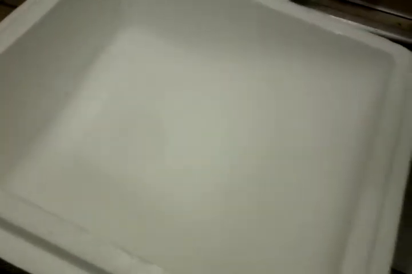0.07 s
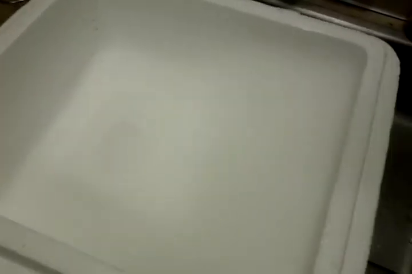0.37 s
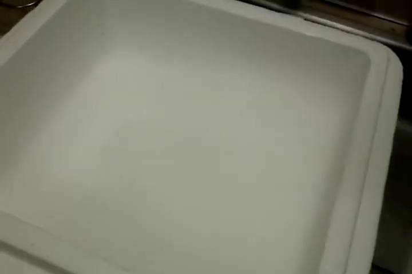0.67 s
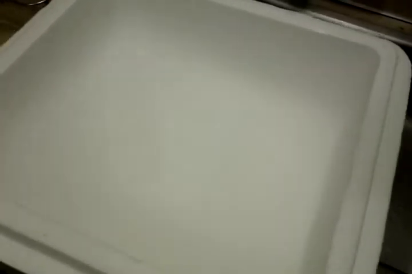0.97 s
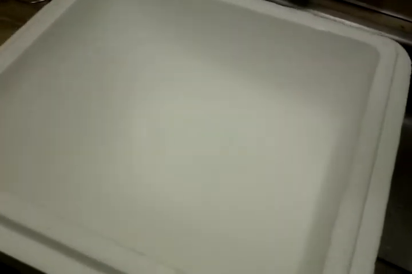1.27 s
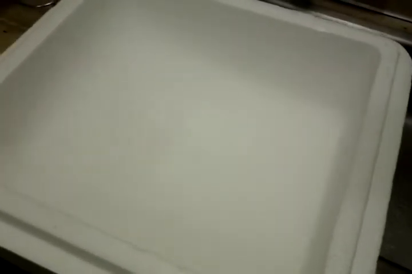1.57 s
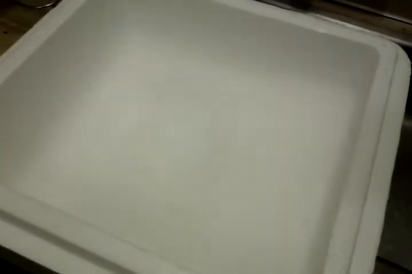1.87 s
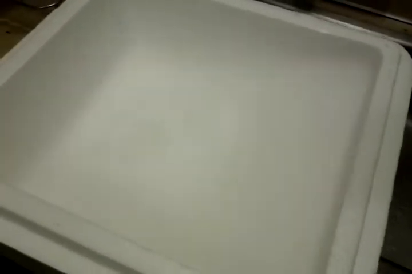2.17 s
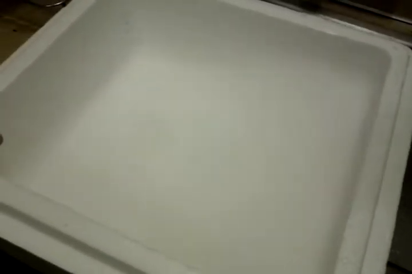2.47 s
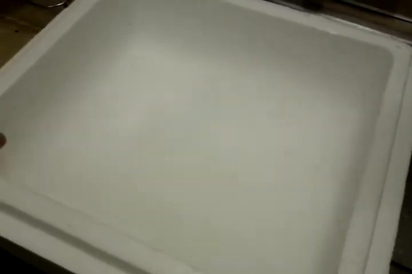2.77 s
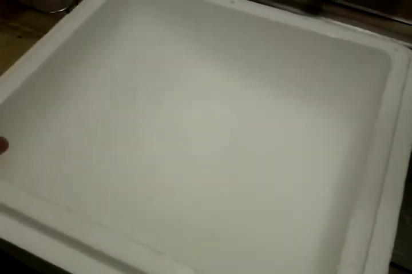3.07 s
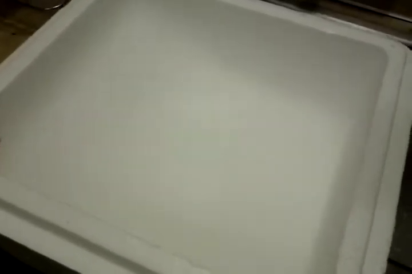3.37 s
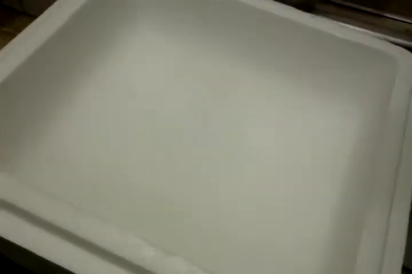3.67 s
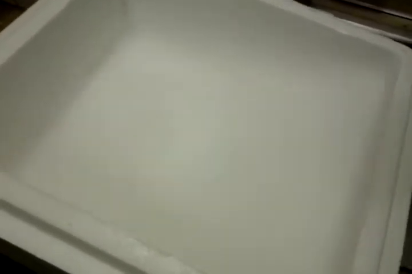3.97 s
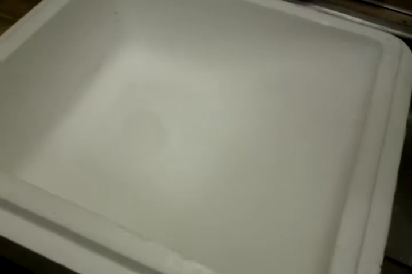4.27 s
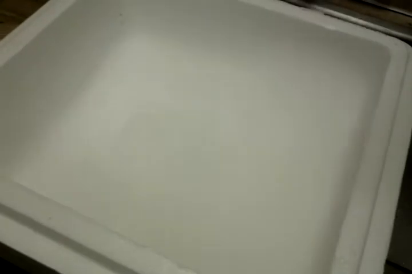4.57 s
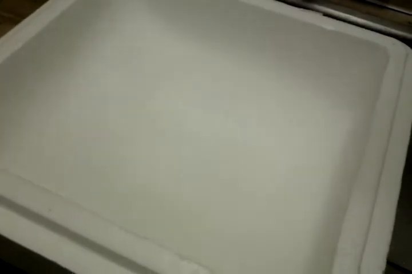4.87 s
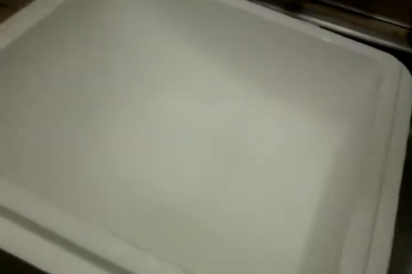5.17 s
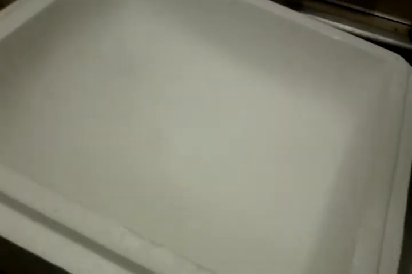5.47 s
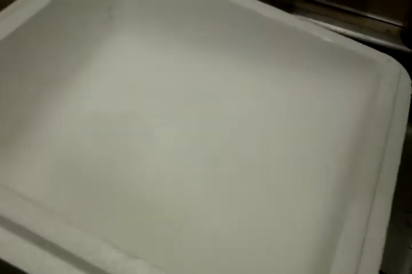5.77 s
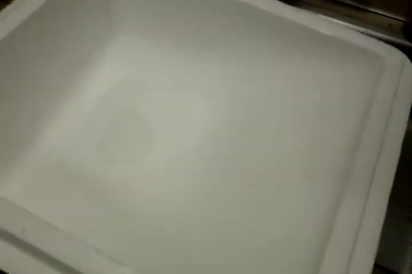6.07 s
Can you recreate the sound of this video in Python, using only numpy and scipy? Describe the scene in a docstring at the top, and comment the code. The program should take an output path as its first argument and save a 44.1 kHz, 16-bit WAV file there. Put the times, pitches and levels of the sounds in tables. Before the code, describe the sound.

Heard up close in a hushed room, dry ice in a plastic tub squeaks briefly, then snaps several times in quick succession, making the tub thump. It settles to a faint fizz with a few isolated clicks. Then a second strong snap sets off scattered crackling, tiny high squeaks and occasional light bumps, while a soft hiss of gas swells and fades underneath.

```python
"""Short, high squeaks come first, then a burst of sharp cracks: dry ice in a plastic tub, close by.
Escaping gas makes the ice squeak, and the chilled ice snaps and crackles.
Shifting pieces knock on the tub, and every crack kicks it too. In between, fine ticks,
faint squeaks and a soft hiss follow the flow of gas, over the hush of a quiet room."""
import sys
import numpy as np
from scipy import signal
from scipy.io import wavfile
from scipy.ndimage import uniform_filter1d, minimum_filter1d

SR = 44100
rng = np.random.default_rng(int(sys.argv[2]) if len(sys.argv) > 2 else 0)


def generate_wav(sig):
    """Save sig (samples, or channels by samples) to the path in sys.argv[1] as 16-bit PCM at SR."""
    pcm = np.round(np.clip(np.atleast_2d(sig).T, -1, 1) * 32767).astype(np.int16)
    wavfile.write(sys.argv[1], SR, pcm)


N = 274743
BINS = np.fft.rfftfreq(2048, 1 / SR)  # the frequencies [Hz] at which a filter's gain is set
ROOM_FADE_S, TUB_FADE_S = 0.51, 0.12  # time for the echoes to fade by 60 dB


def amp(db):
    """Turns decibels into a gain to multiply by."""
    return 10 ** (np.asarray(db) / 20)


def unit_level(x):
    """Scales x so that its average strength (rms) is 1."""
    return x / np.sqrt(np.mean(np.abs(x) ** 2) + 1e-20)


def tone_curve(points):
    """Joins (frequency, level) points into a gain for each frequency in BINS."""
    hz, db = np.transpose(points)
    return amp(np.interp(np.log(BINS + 1), np.log(hz + 1), db))


def bump(hz, centre_hz, octaves):
    """A bell-shaped gain around a centre frequency."""
    return np.exp(-.5 * (np.log2((hz + 1) / centre_hz) / octaves) ** 2)


def add(mix, start_s, sound):
    """Mixes a sound in at its start time."""
    part = mix[max(round(start_s * SR), 0):][:len(sound)]
    part += sound[:len(part)]


def colour(x, gain):
    """Shapes the tone of x. The filter never rings ahead of a sound, so snaps stay sharp."""
    log_gain = np.log(np.maximum(gain, gain.max() * 1e-4))
    mirrored = np.concatenate([log_gain, log_gain[-2:0:-1]])
    taps = np.fft.ifft(np.exp(np.conj(signal.hilbert(mirrored)))).real
    return signal.oaconvolve(x, taps[:len(BINS)])[:len(x)]


def low_pass(x, edge_hz):
    """Cuts away the treble above edge_hz."""
    taps = signal.firwin(201, edge_hz, window=("kaiser", 9), fs=SR)
    return signal.oaconvolve(x, taps[None], "same")


def echoes(fade_s, rise_s):
    """A wash of reflections that builds up and dies away, new for every spot in the tub."""
    t = np.arange(SR * 3 // 4) / SR
    wash = rng.standard_normal(len(t)) * amp(-60 * t / fade_s) * (1 - np.exp(-t / rise_s))
    return wash / np.linalg.norm(wash)


def burst(decay_s, snap, grain, rise_s, tub_db, room_db):
    """One snap in a fading spray of tiny breaks, plus echoes. More grain makes the spray rougher."""
    t = np.arange(SR * 3 // 4) / SR
    sizes = np.exp(grain * rng.standard_normal(len(t)) - t / max(decay_s, 1e-3))
    sizes *= 1 - np.exp(-t / rise_s)
    spray = rng.standard_normal(len(t)) * sizes
    spray /= np.linalg.norm(spray)
    spray[round(rise_s * SR)] += snap
    direct = spray / np.sqrt(np.mean(spray[:round(.008 * SR)] ** 2))  # the first 8 ms set the level
    in_tub = amp(tub_db) * echoes(TUB_FADE_S, rise_s=0.0083)
    in_room = amp(room_db) * echoes(ROOM_FADE_S, rise_s=0.012)
    return direct + np.linalg.norm(direct) * (in_tub + in_room)


# the tone of the still room: (frequency [Hz], relative level [dB])
HUSH_TONE = [(18, -54.5), (30, -27.5), (81, -6), (154, -9), (219, -7), (259, -3), (328, -4), (503, -11.5),
             (607, -10), (826, -11), (1050, -12.5), (1270, -14.5), (2770, -18), (7480, -24.5),
             (8620, -43.5), (11200, -85), (19000, -120)]


def room_hush():
    """The quiet room: steady noise, mostly low in pitch."""
    return amp(-60) * unit_level(colour(rng.standard_normal(N), tone_curve(HUSH_TONE)))


# how briskly the ice gives off gas: (time [s], level [dB])
GAS_FLOW = [(0,-45.5), (.2,-49.5), (.55,-48), (.65,-56.5), (.95,-59.5), (1.03,-53), (1.5,-61), (2.15,-59.5),
            (2.55,-66), (3.2,-64), (3.3,-48.5), (3.65,-54), (3.85,-60.5), (4.5,-50.5), (5.4,-60), (5.8,-58),
            (6.03,-48.5), (6.23,-63.5)]


def gas_db(time_s):
    """The level of the gas flow at a given time."""
    return np.interp(time_s, *np.transpose(GAS_FLOW))


def fizz(ticks_per_s=300):
    """Fine ticks and a soft hiss swell and fade with the flow of gas."""
    flow = amp(gas_db(np.arange(N) / SR))
    sizes = amp(3.5 * np.minimum(rng.exponential(1, N), 3.5))
    pulses = (rng.random(N) < ticks_per_s / SR) * rng.choice([-1, 1], N) * sizes
    one_tick = burst(decay_s=0.0048, snap=0.9, grain=0.86, rise_s=.0002, tub_db=-12, room_db=-13)
    ticks = amp(-4) * unit_level(signal.oaconvolve(pulses, one_tick)[:N])
    hiss = amp(-4.5) * unit_level(rng.standard_normal(N))
    treble = tone_curve(CRACK_TREBLE_TONE) * bump(BINS, 5000, octaves=.9)
    middle = amp(1.5) * tone_curve(CRACK_MIDDLE_TONE)
    return flow * colour(ticks + hiss, unit_level(np.hypot(treble, middle)))


# the notes the tub rings at: (pitch [Hz], relative level [dB], time to fade by 60 dB [s])
TUB_NOTES = [(93, -2, 0.37), (138.7, -2, 0.21), (186.5, -3.5, 0.19), (218, -12.5, 0.064),
             (258.5, 0.5, 0.18), (281.5, -1.5, 0.11), (306.6, -4.5, 0.22), (344.3, -1, 0.067),
             (393.7, 0.5, 0.16), (433, -14.5, 0.017), (524, -9, 0.09), (568, -8, .07), (654, -23, .06)]


def tub_thump(db, centre_hz, spread):
    """A blow pushes the air in the tub and rings its notes, in a new mix for each spot it lands on."""
    t = np.arange(SR // 3) / SR
    hz, note_db, fade_s = np.transpose(TUB_NOTES)[:, :, None]
    chance_db, side, detune = rng.standard_normal((3, len(TUB_NOTES), 1))
    weight = amp(note_db + chance_db) * bump(hz, centre_hz, spread) * np.sign(side)
    loaded_hz = hz * (1 + 0.022 * detune)  # the moving load shifts the notes a little
    notes = weight * amp(-60 * t / fade_s) * np.sin(2 * np.pi * loaded_hz * t)
    ring = notes.sum(0) * (1 - np.exp(-t / 0.00093))
    swing = t / 0.003  # the air swings back after 3 ms
    air_push = amp(-3) * (1 - swing) * np.exp(-swing) * (1 - np.exp(-t / 0.00079))
    return amp(db) * (ring / np.std(ring[:SR // 50]) + spread * air_push)


# pieces bumping the tub: (time [s], relative level [dB], centre pitch [Hz], spread [octaves])
KNOCK_EVENTS = [(.241,-18,286,1.02), (.251,-28,270,1.05), (.266,-27.5,262,1.05), (.572,-45.5,281.6,0.21),
                (3.281,-42,356,0.3), (3.323,-36.5,355,1.), (3.521,-39.5,296,0.75), (4.31,-48.5,297,0.42),
                (4.393,-32,237,0.81), (5.503,-45,276,0.095), (5.885,-41.5,278,0.75)]
KICK_DB, KICK_LIMIT_DB = -4.5, -30.5  # a kick follows its crack's midrange level, up to a limit
KICK_HZ, KICK_OCTAVES = 370, 0.86


def knocks():
    """Shifting pieces and the kick of each crack thump the tub; the room echoes a little lower."""
    out = np.zeros(N)
    kicks = [(start_s, min(middle_db + KICK_DB, KICK_LIMIT_DB), KICK_HZ, KICK_OCTAVES)
             for start_s, _, middle_db, _ in CRACK_EVENTS]
    for start_s, db, centre_hz, spread in KNOCK_EVENTS + kicks:
        thump = tub_thump(db, centre_hz, spread)
        add(out, start_s, thump)
        echo_tone = unit_level(bump(BINS, centre_hz * .85, spread * 0.77))
        echo = colour(echoes(ROOM_FADE_S, rise_s=.012), echo_tone)
        add(out, start_s, amp(-11) * np.linalg.norm(thump) * echo)
    return out


def faint_squeak_rows(count, usual_hz=4300, scatter_octaves=.25, decay_s=.005):
    """Lists extra squeaks at chance moments, louder when more gas flows."""
    when, softness, pitch = rng.random((count, 3)).T
    start_s = when * N / SR
    db = gas_db(start_s) + 3 - 5 * softness
    hz = usual_hz * 2 ** (scatter_octaves * (2 * pitch - 1))
    return list(zip(start_s, db, hz, np.full(count, decay_s)))


# short squeaks and pops, plus the bright ring of two cracks (at 1.931 s and 4.878 s):
# (time [s], relative level [dB], pitch [Hz], decay time [s])
SQUEAKS_AND_RINGS = [(.009,-42,4200,0.0066), (0.033,-44,4470,.005), (.041,-42.5,1470,0.012),
                     (0.0468,-35.5,3440,0.0048), (.056,-39.5,630,0.03), (.086,-41,1790,0.013),
                     (0.1212,-46.5,7300,0.0035), (0.144,-40,4000,0.012), (.203,-42.5,3570,0.0058),
                     (.393,-34,3180,.007), (.408,-39,5470,.008), (.416,-42,2730,.006), (.424,-36,5400,.011),
                     (.842,-50.5,3160,0.0018), (0.844,-53,4950,0.0037), (1.931,-40,6400,.007),
                     (3.527,-38.5,1040,0.0069), (3.549,-45.5,1840,.008), (3.607,-38,3740,.008),
                     (3.7073,-43,3720,.003), (3.717,-37,4240,0.0022), (3.75,-44.5,980,0.00065),
                     (3.784,-49.5,790,0.0011), (3.9099,-39.5,3840,0.0064), (3.9694,-45.5,3800,0.0046),
                     (4.0016,-37.5,3950,0.0015), (4.002,-48,1740,0.013), (4.004,-41,4470,0.011),
                     (4.112,-47,4460,.0036), (4.1209,-44,4500,.0035), (4.135,-46,3800,0.014),
                     (4.145,-41,4100,0.0084), (4.2133,-44,3860,.0015), (4.222,-38,4050,0.0065),
                     (4.3038,-40,1890,0.0064), (4.311,-36,2270,0.0085), (4.321,-38.5,2970,0.0038),
                     (4.434,-31.5,5180,.008), (4.467,-37.5,3630,0.026), (4.878,-44.5,5950,.003),
                     (5.039,-49.5,5260,0.022), (5.067,-51.5,1860,0.0058), (5.1086,-47,1300,0.00057),
                     (5.212,-51.5,4050,.005), (5.2466,-36,4500,0.0049), (5.7643,-47,2860,0.0017),
                     (5.972,-46,3820,0.016), (6.019,-40,4370,0.009), (6.049,-43,4300,0.0081)]


def squeaks_and_rings():
    """Each rings one pitch over a broad rasp. The squeaks are gas forcing its way out under the ice."""
    out = np.zeros(N)
    treble_cut = 1 / (1 + (BINS / 6800) ** 12)
    for start_s, db, hz, decay_s in SQUEAKS_AND_RINGS + faint_squeak_rows(count=24):
        half_width_hz = .62 * (810 + 0.23 / decay_s)  # a shorter sound has a blurrier pitch
        ring = 1 / (1 + ((BINS - hz) / half_width_hz) ** 2)
        rasp = amp(-12) * bump(BINS, hz, octaves=.75) * treble_cut
        jolts = burst(decay_s, snap=0.17, grain=0.56, rise_s=0.00012, tub_db=-11.5, room_db=-11.5)
        add(out, start_s, amp(db) * colour(jolts, unit_level(np.hypot(ring, rasp))))
    return out


# the midrange and treble of a crack, shared by the fizz: (frequency [Hz], relative level [dB])
CRACK_MIDDLE_TONE = [(100, -18), (300, 2.5), (650, 1.5), (1100, -3), (1700, -3), (2300, -4.5),
                     (3000, -22.5), (5000, -41)]
CRACK_TREBLE_TONE = [(1500, -36), (2300, -5), (2800, -0.5), (4000, 1), (5000, -1), (6600, 0.5),
                     (7300, -5.5), (8000, -13.5), (9000, -30.5)]
# sudden breaks, and a few longer spurts of hissing gas (at 0.4757, 0.989, 1.1265 and 3.243 s): (time [s],
# treble level [dB], midrange level [dB], decay time [s])
CRACK_EVENTS = [(0.2441,-15.5,-24,0.0061), (0.2549,-20.5,-26.5,0.0033), (0.2642,-30.5,-30,0.0024),
                (0.2754,-6.5,-16,0.0039), (0.286,-19.5,-30.5,0.0032), (0.3202,-24,-32,.0012),
                (0.4757,-36.5,-58,0.038), (.526,-38.5,-44,.008), (0.568,-43,-58,0.0032),
                (.989,-45.5,-61.5,0.023), (1.1265,-54,-75,0.022), (1.5725,-38.5,-43.5,0.0048),
                (1.933,-41,-47,0.016), (2.2059,-56,-68,0.0078), (2.2645,-52.5,-56.5,0.005),
                (2.3836,-45,-49,0.0053), (3.243,-49.5,-54.5,0.031), (3.278,-40.5,-42,0.012),
                (3.294,-35.5,-62,0.0035), (3.3222,-16.5,-23,0.0069), (3.377,-36.5,-38,0.0053),
                (3.4238,-36.5,-41,.006), (3.497,-35.5,-36.5,0.014), (3.52,-43,-50,0.0033),
                (3.548,-42.5,-42.5,0.0062), (3.5739,-39.5,-46,0.0073), (3.6191,-31.5,-35.5,.01),
                (3.6749,-37,-39.5,0.014), (3.7965,-45.5,-53.5,0.0092), (4.3944,-37.5,-45.5,.033),
                (4.4349,-39,-46,0.0084), (4.547,-45.5,-50.5,0.022), (4.8785,-44.5,-54,.0045),
                (4.889,-48,-48,0.016), (5.1169,-54.5,-63.5,0.0024), (5.307,-34.5,-42,0.011),
                (5.321,-40,-38,0.011), (5.346,-34.5,-44,.005), (5.3521,-33,-36,0.0076),
                (5.499,-47.5,-53,0.0026), (5.884,-33,-42.5,0.0038), (5.892,-35,-37,0.0083),
                (5.9948,-35,-44,0.0063), (6.1121,-49,-65,.0043)]
USUAL_CRACK_HZ, USUAL_CRACK_DB, OCTAVES_PER_DB = 4800, -35, 0.01


def cracks():
    """Ice and chilled plastic snap brightly, and a few longer spurts of gas hiss out. Bigger breaks sound
    lower; longer ones start more softly."""
    out = np.zeros(N)
    middle = unit_level(tone_curve(CRACK_MIDDLE_TONE))
    for start_s, treble_db, middle_db, decay_s in CRACK_EVENTS:
        centre_hz = USUAL_CRACK_HZ * 2 ** (-OCTAVES_PER_DB * (treble_db - USUAL_CRACK_DB))
        treble = unit_level(tone_curve(CRACK_TREBLE_TONE) * bump(BINS, centre_hz, octaves=1))
        tone = np.hypot(amp(treble_db) * treble, amp(middle_db) * middle)
        crack = burst(decay_s, snap=0.44, grain=0.37, rise_s=0.13 * decay_s, tub_db=-6.5, room_db=-11)
        add(out, start_s, colour(crack, tone))
    return out


def scene():
    """Ice, tub and room, mixed into one channel."""
    return (cracks() + amp(-1) * squeaks_and_rings() + amp(-1.5) * knocks() + fizz() + room_hush())[None]


def record(dry):
    """The microphone misses the highest treble; a fast limiter turns down only the hardest snaps."""
    heard = low_pass(dry, edge_hz=8900)
    allowed_gain = 1 / np.maximum(np.abs(heard) / .71, 1)
    smooth_gain = uniform_filter1d(minimum_filter1d(allowed_gain, size=21), size=21)
    return low_pass(heard * smooth_gain, edge_hz=16000)


dry = scene()
out = record(dry)
generate_wav(out)
```